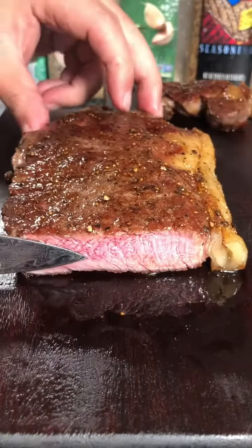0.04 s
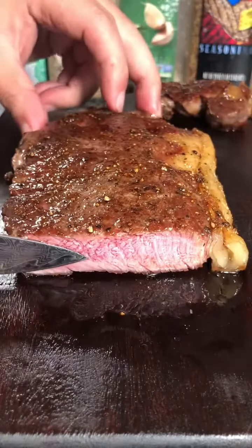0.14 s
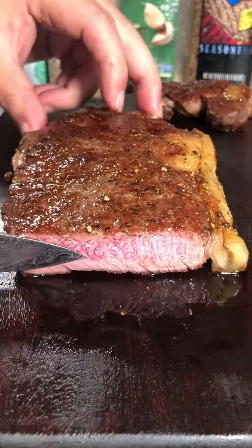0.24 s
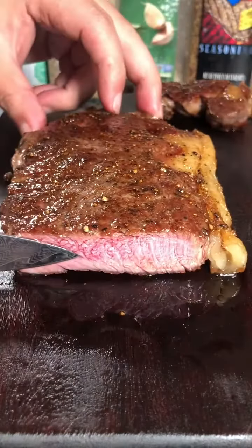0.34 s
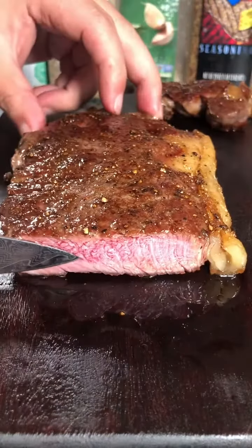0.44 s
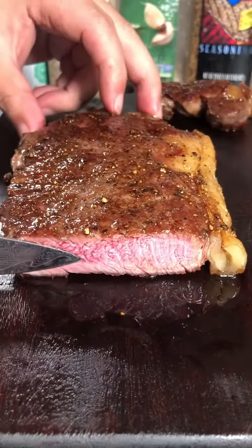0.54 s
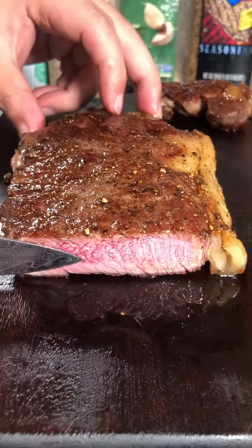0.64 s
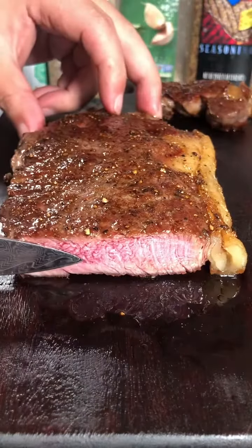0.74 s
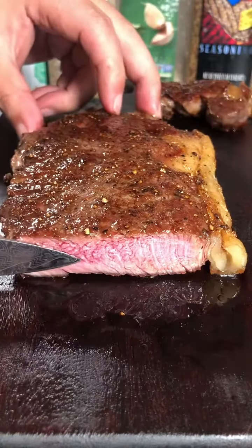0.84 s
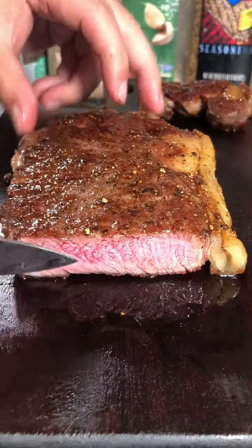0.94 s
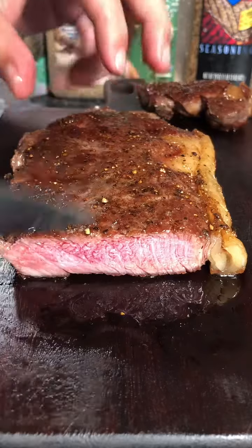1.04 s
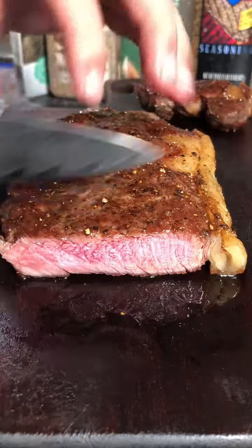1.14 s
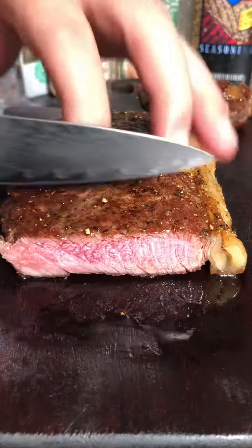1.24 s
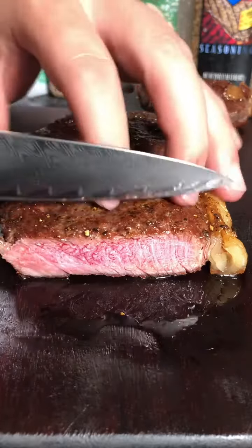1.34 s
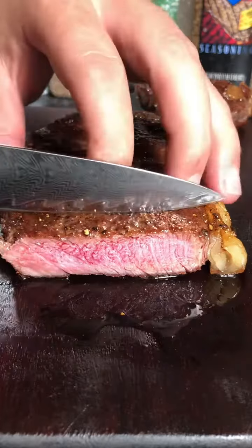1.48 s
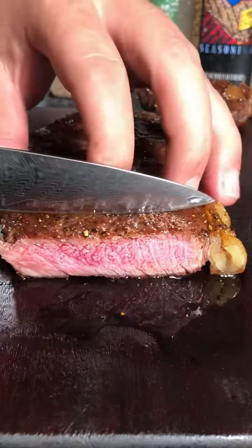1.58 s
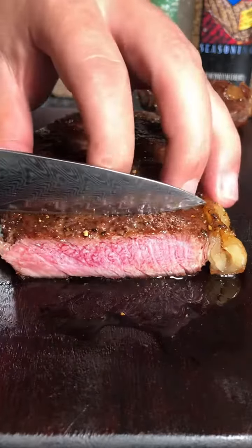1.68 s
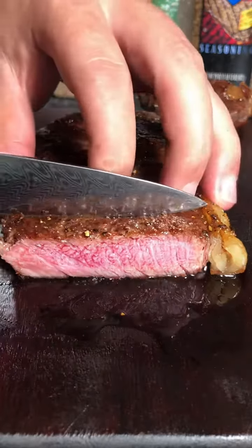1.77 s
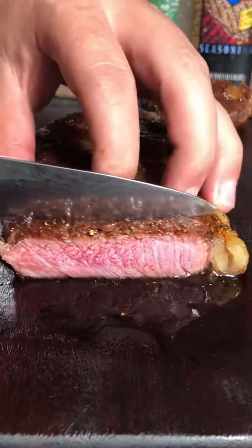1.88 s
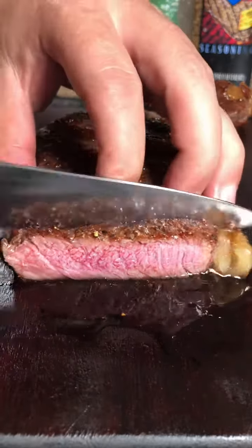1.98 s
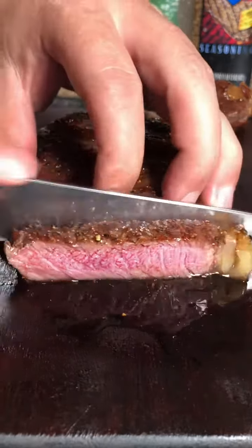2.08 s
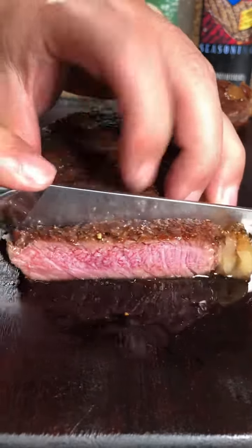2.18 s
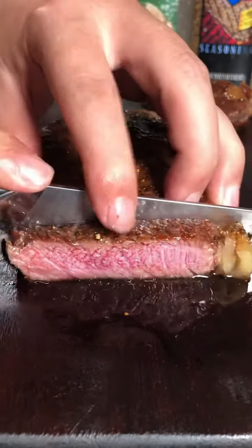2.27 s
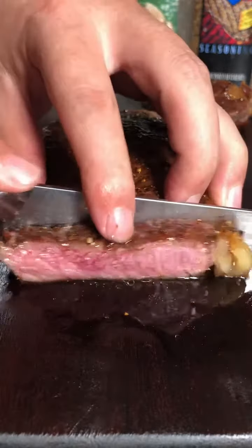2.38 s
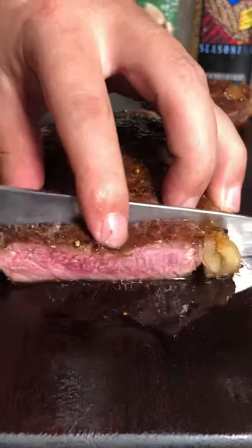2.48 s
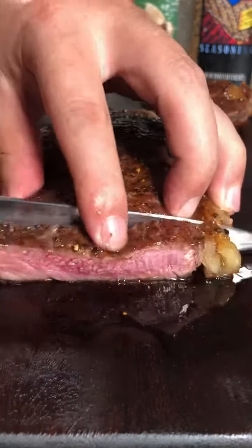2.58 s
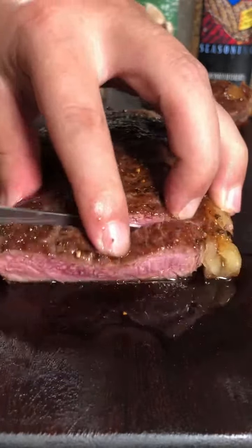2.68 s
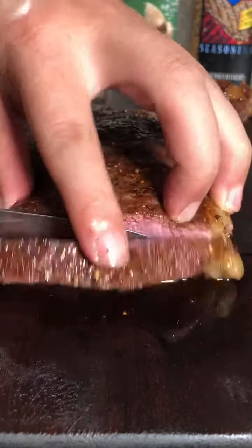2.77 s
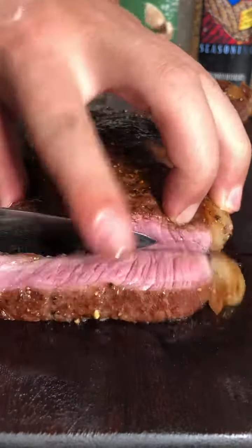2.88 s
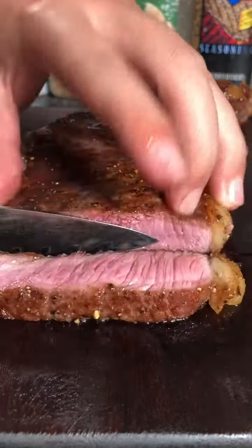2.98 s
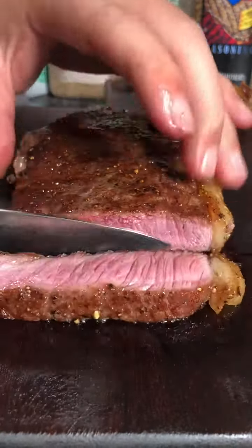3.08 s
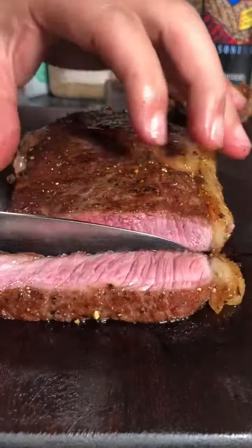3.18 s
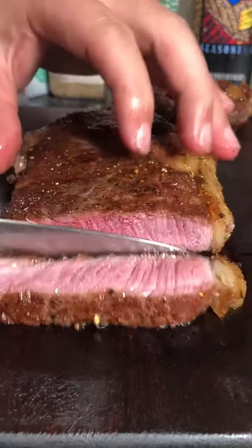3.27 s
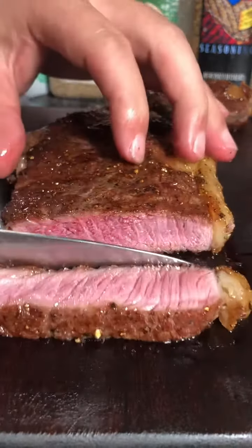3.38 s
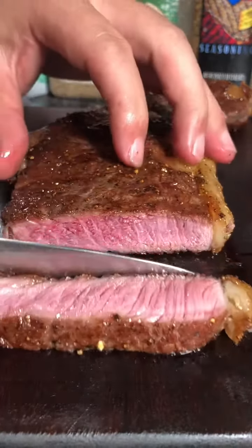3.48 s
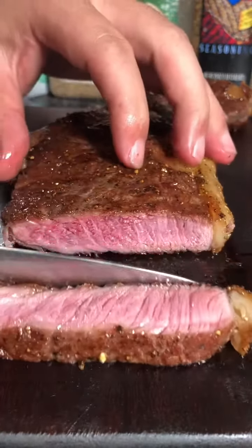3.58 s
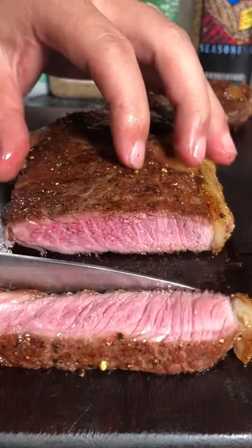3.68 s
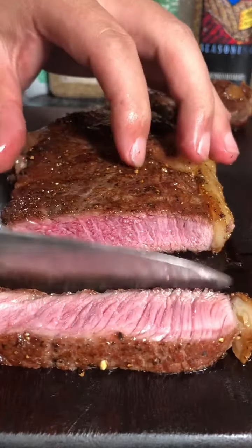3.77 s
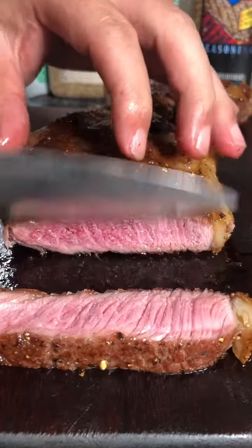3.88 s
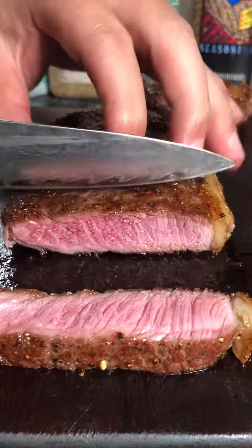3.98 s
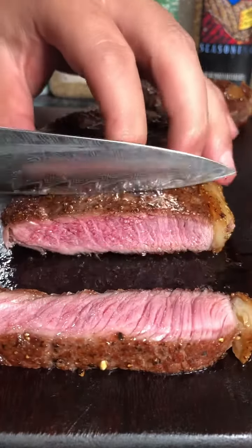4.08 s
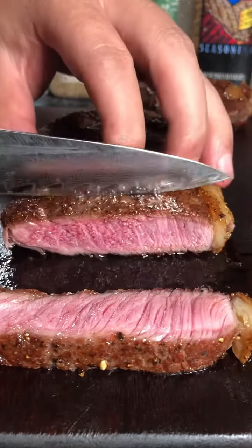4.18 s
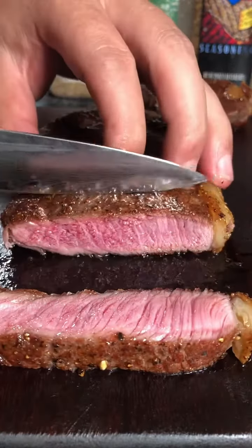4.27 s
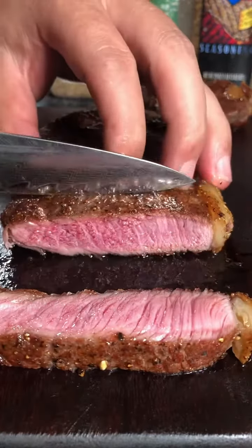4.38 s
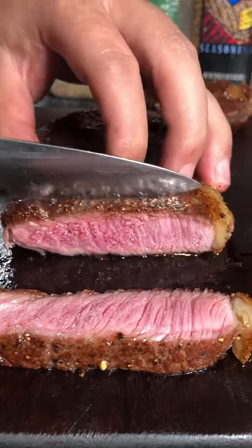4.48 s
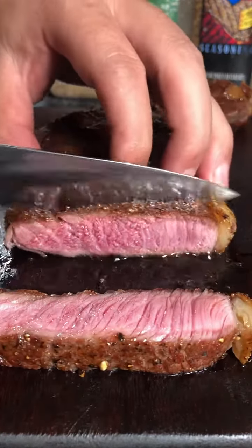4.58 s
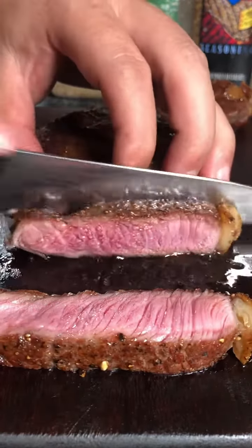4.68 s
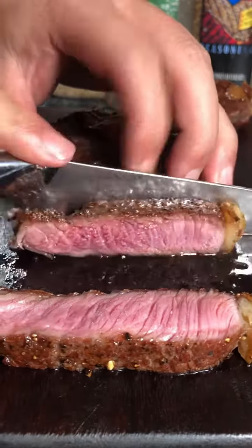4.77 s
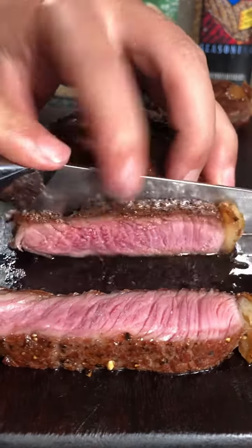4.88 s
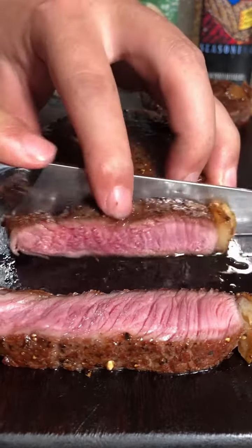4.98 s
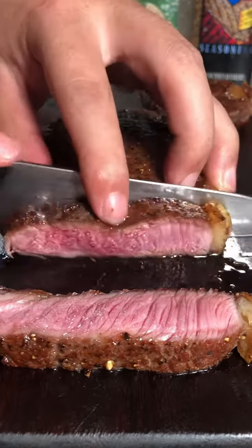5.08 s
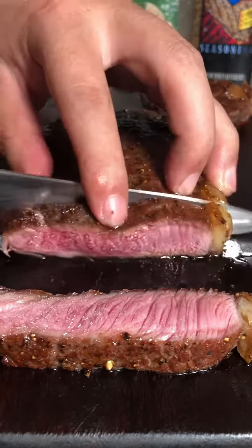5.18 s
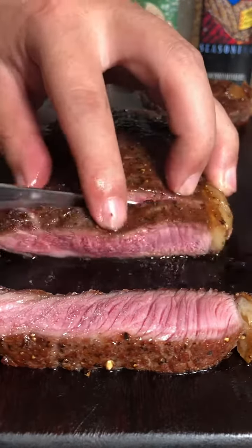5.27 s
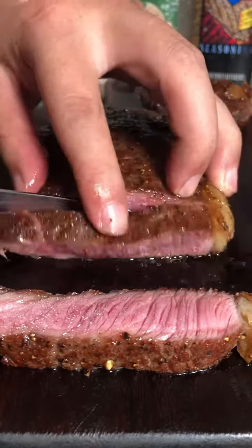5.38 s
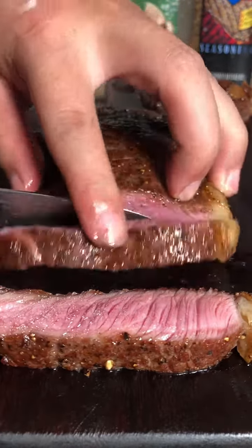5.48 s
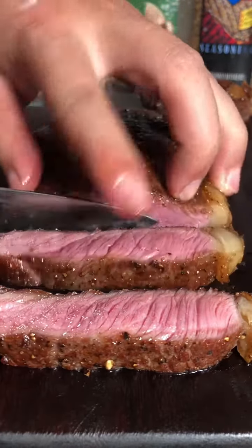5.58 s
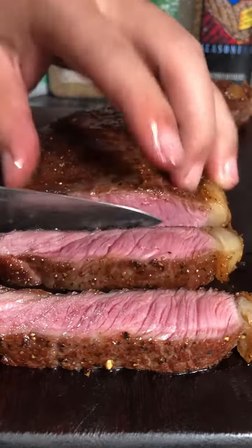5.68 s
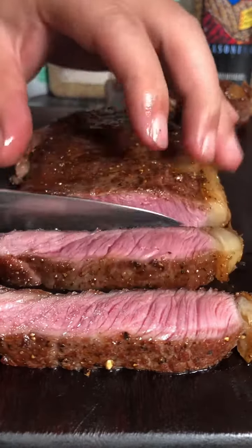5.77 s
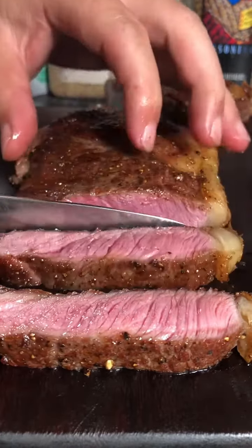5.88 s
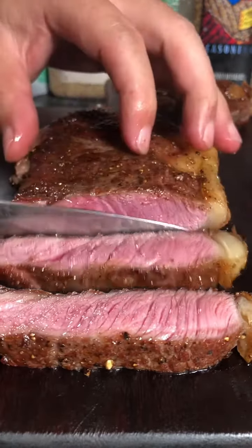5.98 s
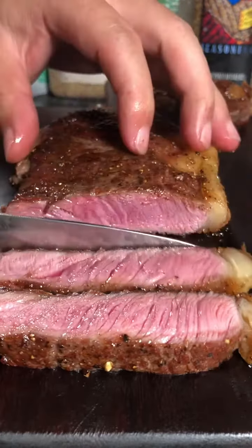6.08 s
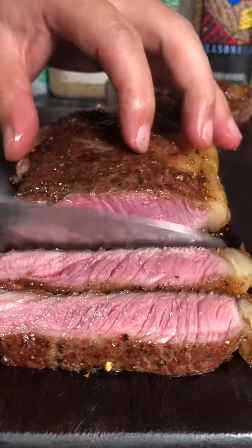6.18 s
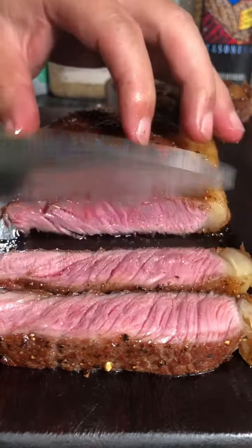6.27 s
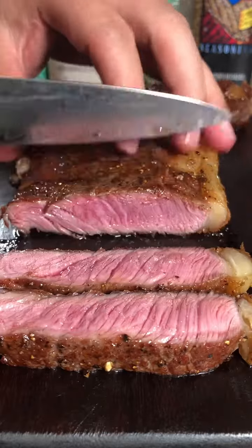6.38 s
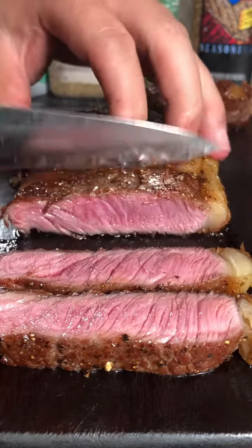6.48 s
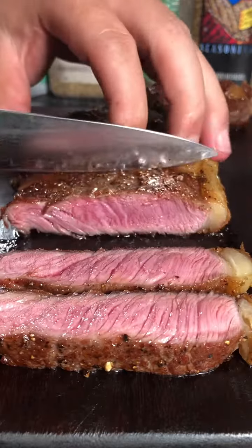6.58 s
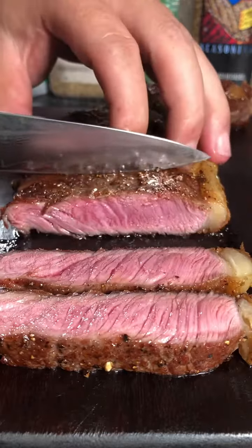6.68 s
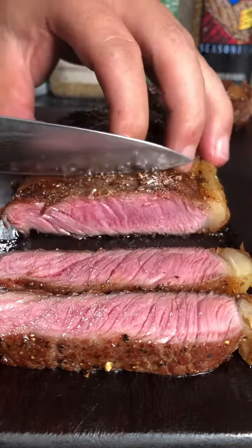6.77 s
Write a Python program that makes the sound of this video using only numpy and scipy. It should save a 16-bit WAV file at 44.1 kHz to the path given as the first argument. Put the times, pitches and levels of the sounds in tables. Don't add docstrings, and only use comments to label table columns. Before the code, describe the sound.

A steady extractor fan rumbles and hisses in a small kitchen, with one soft low thump. Close to a phone microphone, a knife hisses through seared meat and knocks a wooden board, then scrapes back jerkily with a light tap. After a quieter gap the second cut lands harder, and its rasping pull ends in the loudest, shortest knock. Faint steel chinks follow, then only fan.

```python
import sys
import numpy as np
from scipy import signal
from scipy.fft import rfft, irfft, next_fast_len
from scipy.io import wavfile
from scipy.ndimage import uniform_filter1d, map_coordinates

SR = 44100
rng = np.random.default_rng(int(sys.argv[2]) if len(sys.argv) > 2 else 0)


def put_to_file(sound):
    columns = np.atleast_2d(sound).T
    safe = np.clip(columns, -1, 1)
    whole_steps = np.round(safe * 32767)
    wavfile.write(sys.argv[1], SR, whole_steps.astype(np.int16))


def to_linear_factor(level_db):
    exponent = np.asarray(level_db, float) / 20
    return 10 ** exponent


N = 301644


def unit(x):
    return x / np.sqrt(np.mean(x ** 2) + 1e-20)


def along(points, hz):
    point_hz, value = np.transpose(points)
    return np.interp(np.log(hz + 1), np.log(point_hz + 1), value)


def gains(rows):
    start_s, *columns = np.transpose(sorted(map(tuple, rows)))
    t = np.arange(N) / SR
    return np.array([to_linear_factor(np.interp(t, start_s, db, left=-200, right=-200)) for db in columns])


def wobble(per_s):
    return map_coordinates(rng.standard_normal(int(N * per_s / SR) + 4), [np.arange(N) * per_s / SR])


def filtered(x, response):
    m = next_fast_len(N + SR // 2)
    return irfft(rfft(x, m) * response(np.fft.rfftfreq(m, 1 / SR)), m)[:N]


def resonant(peaks):
    def response(f):
        total = 0
        for k, (hz, width, db) in enumerate(peaks):
            damping = 1j * f * width
            total = total + (-1) ** k * to_linear_factor(db) * damping / (hz * hz - f * f + damping)
        return total
    return response


def ring(modes, rise_s, t):
    tones = sum(to_linear_factor(db - 60 * t / t60) * np.sin(2 * np.pi * hz * t) for hz, db, t60 in modes)
    return (1 - np.exp(-t / rise_s)) ** 2 * tones


def add(track, start_s, sound):
    track[round(start_s * SR):][:len(sound)] += sound


def swells(rows):
    edge_db = -19
    return [[(s - rise, db + edge_db), (s, db), (s + fall, db + edge_db)] for s, db, rise, fall in rows]


def skids():
    skid_db, fall_db_per_s = [-37.5, -35], 190
    rebound_s, rebound_db, rebound_width_s = 0.067, 8, 0.0086
    t = np.linspace(0.03, 0.15, num=40)
    rebound = rebound_db * np.exp(-0.5 * ((t - rebound_s) / rebound_width_s) ** 2)
    shape_db = rebound - fall_db_per_s * t
    return [np.transpose([knock[0] + t, db + shape_db]) for knock, db in zip(KNOCKS, skid_db)]


GROWS = (1.11, 0.91, 0.81, .5)


def excited(motion, mix_db):
    effort_db = -45
    over = gains(np.array(motion) - [0, effort_db])
    return to_linear_factor(effort_db + np.array(mix_db))[:, None] * over ** np.array(GROWS)[:, None]


# (start_s, effort_db)
PUSHES = [
    [(1.88, -66), (1.906, -56.5), (1.99, -50), (2.003, -46.5), (2.031, -48), (2.058, -44), (2.075, -48),
     (2.11, -58)],
    [(4.47, -64), (4.498, -61), (4.562, -51), (4.605, -48.5), (4.647, -40.5), (4.688, -46.5), (4.71, -38.5),
     (4.735, -50), (4.755, -58)],
]
# (start_s, effort_db)
PULLS = [
    [(2.40, -60), (2.45, -49), (2.52, -50.5), (2.549, -39), (2.575, -53.5), (2.59, -42), (2.631, -36),
     (2.68, -45.5), (2.78, -63.5)],
    [(5.11, -58), (5.14, -45), (5.17, -39.5), (5.2, -33), (5.222, -34), (5.25, -33), (5.268, -46.5),
     (5.33, -50.5), (5.40, -59)],
]
# (board_db, blade_db, fibre_db, crust_db)
PUSH_MIX = [(-2, .3, -6, -22), (-7, .3, -9.5, -28)]
# (board_db, blade_db, fibre_db, crust_db)
PULL_MIX = [(2, 0.18, -9.5, -28), (3, -0.82, -14, -30)]
# (peak_s, effort_db, rise_s, fall_s)
BRUSHES = [
    (2.31, -59, .012, 0.11),
    (4.95, -46.5, 0.033, 0.04),
    (5.08, -50, 0.1, .03),
    (5.757, -51.5, .008, .05),
    (5.89, -59, .03, .04),
]


def strokes_of_the_knife():
    motions = [*zip(PUSHES + PULLS, PUSH_MIX + PULL_MIX)]
    motions += [(skid, (-7.5, -17, -22, -36)) for skid in skids()]
    motions += [(brush, (-2.5, 0.5, -6, -22)) for brush in swells(BRUSHES)]
    return sum(excited(motion, mix_db) for motion, mix_db in motions)


def grit(per_s, spread_db, clump_db, smooth):
    chance, size, sign = rng.random(N), rng.standard_normal(N), rng.standard_normal(N)
    slips = unit((chance < per_s / SR) * to_linear_factor(spread_db * np.clip(size, -2, 2)) * np.sign(sign))
    grip_changes_per_s = 90
    return (slips + smooth * rng.standard_normal(N)) * to_linear_factor(clump_db * wobble(grip_changes_per_s))


# (pitch_hz, width_hz, level_db)
BOARD_RUB = [(875, 134, -0.5), (1092, 100, 0.5), (1313, 188, -6), (537, 190, -9)]
# (pitch_hz, width_hz, level_db)
BOARD_LANDED = [(905, 106, 0.5), (1050, 110, -6.5), (1500, 140, -11), (690, 120, -11)]
# (pitch_hz, width_hz, level_db)
BLADE_RASP = [(1507, 91, -4), (1733, 134, 0.5), (1842, 62, 1.5), (2170, 320, -9), (2674, 200, -6.5),
              (3070, 310, -10.5)]
# (pitch_hz, width_hz, level_db)
FIBRE = [(3830, 630, 1), (5200, 800, 0.5), (6240, 480, 0), (7730, 1700, -7.5)]
# (pitch_hz, level_db per Hz)
CRUST = [(7000, -30), (9500, 0), (13000, -4), (15700, -5), (18000, -30)]
# (peak_s, hiss_db, rise_s, fall_s)
TEARS = [
    (2.015, -56, .025, 0.041),
    (2.6, -66, .04, .08),
    (4.647, -63, .05, .05),
    (4.95, -61, .02, .035),
]


def slicing():
    rub, rasp, fibre, crust = strokes_of_the_knife()
    crust = crust + sum(gains(tear)[0] for tear in swells(TEARS))
    skid = sum(gains(motion)[0] for motion in skids())
    shared = grit(per_s=1500, spread_db=4, clump_db=2.1, smooth=1.2)
    fine = grit(per_s=3000, spread_db=4, clump_db=2.2, smooth=0.9)

    def rubbed(slips, peaks):
        body = resonant(peaks)
        return unit(filtered(slips, lambda hz: body(hz) * hz / (hz + 400)))

    wood = rub * rubbed(shared, BOARD_RUB) + skid * rubbed(shared, BOARD_LANDED)
    steel = rasp * rubbed(shared, BLADE_RASP)
    wet = fibre * rubbed(fine, FIBRE)
    hiss = crust * unit(filtered(fine, lambda hz: to_linear_factor(along(CRUST, hz))))
    return wood + steel + wet + hiss


# (start_s, level_db at the peak, rise_s, crack_db, room_db)
KNOCKS = [
    (2.0600, -4, 0.0012, -38, -9.5),
    (4.7150, 0, 0.0025, -40, -13),
    (5.2190, 2, 0.0017, -35, -22),
    (2.626, -23, 0.0018, -28, -17),
    (5.832, -24, .001, -25, -3),
]
# (pitch_hz, level_db, t60_s)
RINGS = [
    [(88, -23, 0.33), (270, -14, 0.088), (394, -20.5, 0.089), (686, -17, .05), (832, 2.5, .016),
     (888, -25, 0.22), (900, -26, 0.18), (1016, -21, 0.083), (1440, -6, 0.016), (2070, -20, .012),
     (2590, -13, 0.013), (3100, -20, .012)],
    [(77, -24, 0.27), (275, -21.5, 0.092), (402, -25.5, 0.089), (590, -26, 0.11), (850, 2.5, 0.018),
     (900, -21, 0.16), (919, -20, 0.14), (1057, -27, 0.14), (1504, -8.5, 0.018), (2400, -9, 0.0095)],
    [(280.6, -28.5, 0.17), (800, 1.5, 0.0079), (1110, -18, 0.043), (1700, 5.5, 0.0074), (2190, -8, 0.0093),
     (2800, -26, .009), (3500, -20, .008), (4300, -27, .008), (5200, -28, 0.0092), (6200, -24, 0.015)],
    [(800, 2, 0.05), (1500, -1, 0.044), (1843, 0, 0.055), (2800, -14, .03)],
    [(400, 0, 0.023), (783, 2.5, 0.021), (1500, -21, .02)],
]


def knocks():
    track, t = np.zeros(N + SR), np.arange(SR // 3) / SR
    wood = signal.butter(2, 6000, fs=SR)
    for (s, db, rise_s, crack_db, room_db), modes in zip(KNOCKS, RINGS):
        dull = signal.lfilter(*wood, rng.standard_normal(len(t))) * (1 - np.exp(-t / 0.0007))
        crack = to_linear_factor(crack_db + 8.5 - 60 * t / 0.022) * dull
        blow = to_linear_factor(db) * (ring(modes, rise_s, t) + crack)
        add(track, s, blow)
        early = blow * to_linear_factor(-60 * t / 0.05)
        add(track, s, to_linear_factor(room_db) * room(early))
    return track[:N]


# (start_s, level_db at the peak, pitch_hz, width_hz)
SNAPS = [(1.934, -47, 6000, 4000), (2.001, -40, 5300, 2500), (2.411, -44, 5000, 3000),
         (2.435, -45, 2900, 800), (2.530, -34, 1600, 800), (2.553, -45, 5270, 2500),
         (2.589, -39, 6500, 4000), (2.603, -39, 7000, 3000), (2.631, -35, 5000, 5000),
         (2.642, -42, 6500, 4000), (2.863, -34, 5000, 4000), (2.864, -37.5, 2450, 900),
         (4.456, -45.5, 6660, 1200), (4.501, -36, 2300, 1100), (4.555, -33, 1780, 500),
         (4.556, -34, 2800, 1500), (4.623, -40, 5200, 700), (4.704, -30, 1920, 500),
         (4.941, -38, 6000, 12000), (4.950, -40, 7950, 12000), (4.982, -50, 9000, 2500),
         (5.07, -40, 4500, 3000), (5.134, -28.5, 850, 500), (5.157, -44, 7500, 3000),
         (5.192, -31, 1900, 800), (5.268, -41, 6800, 2000), (5.312, -38, 2900, 600)]


def snaps(track):
    t = np.arange(SR // 5) / SR
    hz_grid = np.fft.rfftfreq(len(t), 1 / SR)
    for s, db, hz, width in SNAPS:
        t60_s = 0.0078 + 9.9 / width
        burst = to_linear_factor(-60 * t / t60_s) * rng.standard_normal(len(t))
        snap = irfft(rfft(burst) * resonant([(hz, width, 0)])(hz_grid) ** 2, len(t))
        add(track, s, to_linear_factor(db) * snap / np.abs(snap).max())


# (start_s, level_db at the peak, upper_modes_db)
CHINKS = [
    (5.755, -34.5, -15),
    (5.763, -44, 3),
    (5.785, -43, 4),
    (5.835, -44, 0),
    (5.897, -46, 0),
]
# (pitch_hz, level_db, t60_s)
STEEL = [(1600, -4.5, 0.066), (1865, 0.5, 0.037), (3860, -9, .05), (4700, -12, .04), (6300, -3.5, 0.038)]


def chinks(track):
    t = np.arange(SR // 5) / SR
    for s, db, upper_db in CHINKS:
        modes = []
        for hz, level, t60 in STEEL:
            modes.append((hz, level + upper_db * (hz > 3000) + rng.normal(0, 1.5), t60))
        add(track, s, to_linear_factor(db) * ring(modes, 0.002, t))


# (start_s, level_db at the peak, pitch_hz)
THUMPS = [
    (1.486, -34, 91.5),
    (3.022, -30.5, 97),
    (3.096, -32, 88),
    (4.558, -28, 91.5),
    (5.566, -28, 96.9),
]


def thumps(track):
    t = np.arange(SR // 5) / SR
    for s, db, hz in THUMPS:
        add(track, s, to_linear_factor(db + 5.5) * ring([(hz, 0, 0.2)], 0.0076, t))


def small_sounds():
    track = np.zeros(N + SR)
    snaps(track)
    chinks(track)
    thumps(track)
    return track[:N]


# (pitch_hz, t60_s)
KITCHEN = [(150, 0.39), (900, .35), (2500, 0.13), (8000, .15)]


def room(sound):
    hz, t, z = signal.stft(rng.standard_normal(SR // 2), SR, nperseg=256)
    fading = z * to_linear_factor(-60 * t / along(KITCHEN, hz)[:, None])
    tail = signal.istft(fading, SR, nperseg=256)[1]
    return signal.fftconvolve(np.pad(sound, (250, 0)), tail / np.linalg.norm(tail))


def rush(spectrum, patchy_db):
    z = signal.stft(rng.standard_normal(N), nperseg=512)[2]
    field = uniform_filter1d(rng.standard_normal(z.shape), 5, 0)
    field = uniform_filter1d(field, 12, 1)
    patchy = signal.istft(z * to_linear_factor(patchy_db * unit(field)), nperseg=512)[1][:N]
    return unit(filtered(patchy, lambda hz: to_linear_factor(along(spectrum, hz))))


# (pitch_hz, level_db per Hz)
RUMBLE = [(15, -54), (25, -46), (42, -11.5), (70, -7.5), (102, 0.5), (141, 0.5), (167, -7), (182, -6),
          (205, -2), (231, -4.5), (247, -11.5), (269, -19), (330, -19), (430, -48), (730, -120)]
# (pitch_hz, level_db per Hz)
AIRFLOW = [(150, -35.5), (260, 1.5), (322, -5.5), (354, -2.5), (372, -6.5), (402, -0.5), (465, -7),
           (551, -3.5), (605, -11), (866, -8.5), (1010, -15), (1620, -19), (2000, -25.5), (2600, -34),
           (4400, -120)]
# (pitch_hz, level_db per Hz)
HISS = [(880, -14.5), (1500, -6.5), (2360, -6), (7900, -12), (8540, -14.5), (14700, -21.5), (15700, -25)]
# (start_s, level_db)
FAN_DRIFT = [(0, 0), (1.05, 0.4), (1.39, -2), (1.94, 1.9), (2.13, -0.5), (3.27, -1.4), (3.98, 1.3), (4.3, 0),
             (4.76, 2.5), (5.22, 0.3), (5.68, 2.5), (6.84, .6)]


def fan():
    drift, = gains(FAN_DRIFT)
    rumble = to_linear_factor(-41) * drift * to_linear_factor(1.0 + 1.0 * wobble(6)) * rush(RUMBLE, patchy_db=1.0)
    airflow_level = to_linear_factor(-46) * drift ** 0.077
    airflow = airflow_level * to_linear_factor(1.0 + 0.69 * wobble(4.95)) * rush(AIRFLOW, patchy_db=0.96)
    hiss = to_linear_factor(-56.5 + 0.27 * wobble(3.0)) * rush(HISS, patchy_db=1.0)
    return rumble + airflow + hiss


def scene():
    strokes, air = slicing(), fan()
    above_rumble = filtered(air, lambda hz: hz ** 2 / (hz ** 2 + 400 ** 2))
    walls = to_linear_factor(-10) * room(strokes)[:N] + to_linear_factor(-13) * room(above_rumble)[:N]
    return (strokes + air + walls + knocks() + small_sounds())[None]


def band_limit(x):
    return signal.sosfilt(signal.butter(12, 15860, fs=SR, output="sos"), x)


# (start_s, end_s)
DROPOUTS = [(0, .32), (.39, .42), (.53, .56), (.76, 1.11), (1.18, 1.48), (1.56, 1.94), (2.23, 2.37),
            (2.95, 3.34), (3.47, 3.71), (3.78, 3.99), (4.03, 4.1), (4.18, 4.27), (4.34, 4.46), (4.81, 4.87),
            (5.45, 6.07), (6.17, 6.63), (6.71, 6.78)]


def record(dry):
    x = filtered(dry[0], lambda hz: hz < 15700)
    band = filtered(x, lambda hz: (hz > 8270) & (hz < 8610))
    t = np.arange(N) / SR
    missing = sum(1.0 * (t >= start) * (t < end) for start, end in DROPOUTS)
    missing = uniform_filter1d(missing, size=600)
    return band_limit((x - missing * band)[None])


dry = scene()
out = record(dry)
put_to_file(out)
```